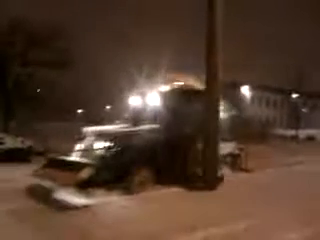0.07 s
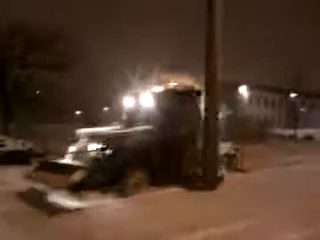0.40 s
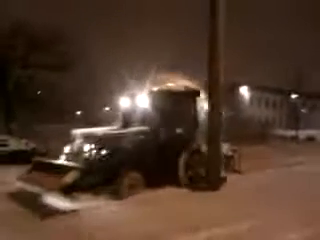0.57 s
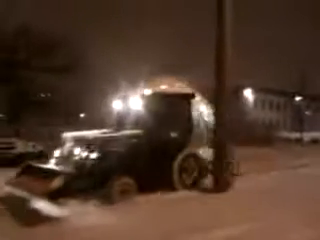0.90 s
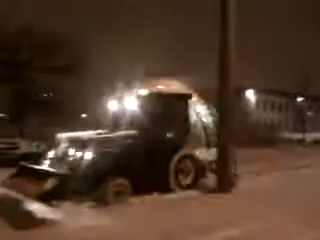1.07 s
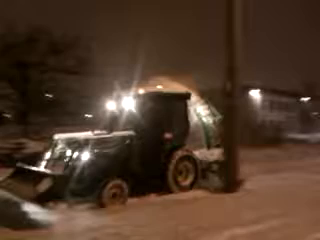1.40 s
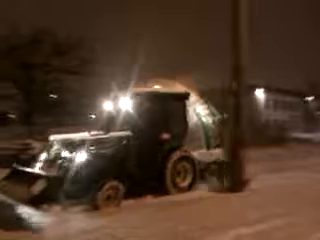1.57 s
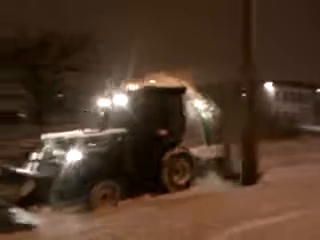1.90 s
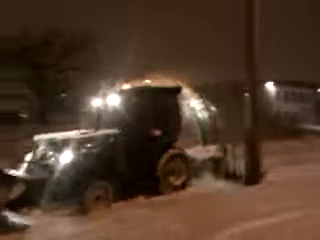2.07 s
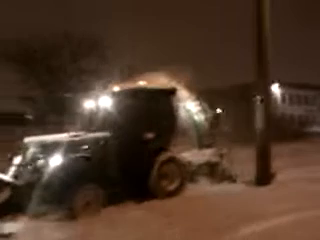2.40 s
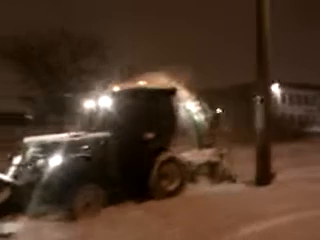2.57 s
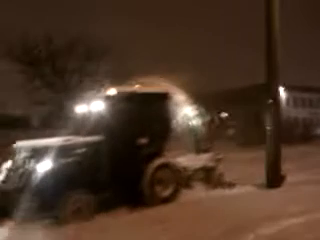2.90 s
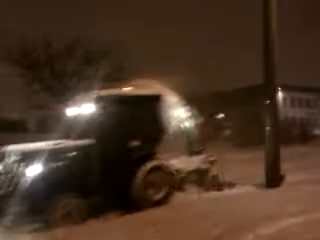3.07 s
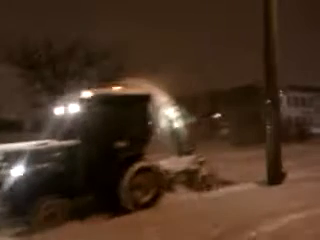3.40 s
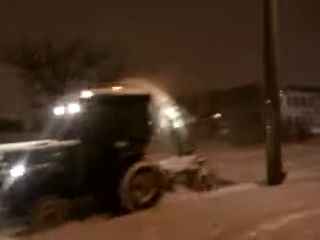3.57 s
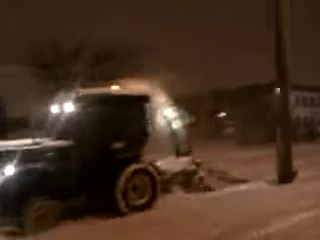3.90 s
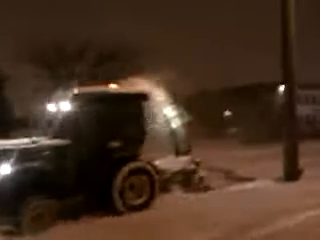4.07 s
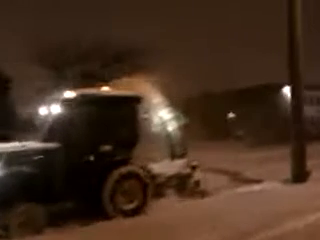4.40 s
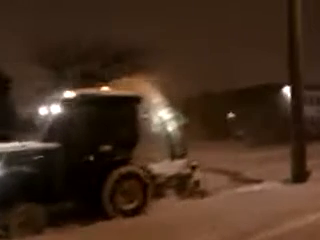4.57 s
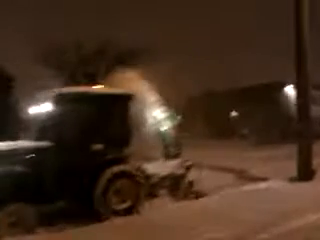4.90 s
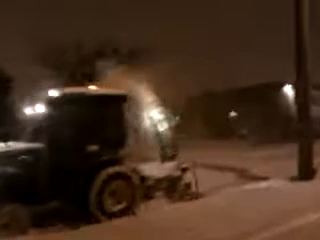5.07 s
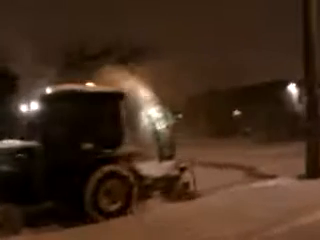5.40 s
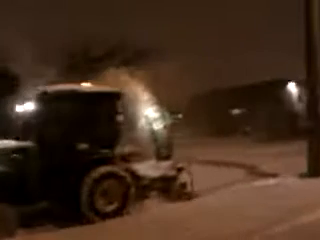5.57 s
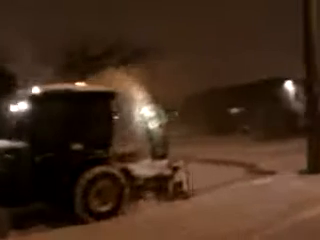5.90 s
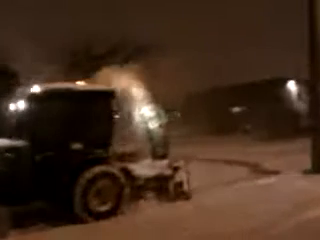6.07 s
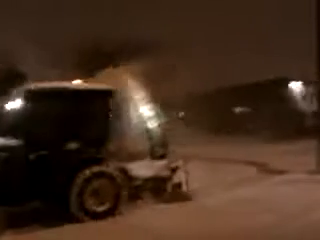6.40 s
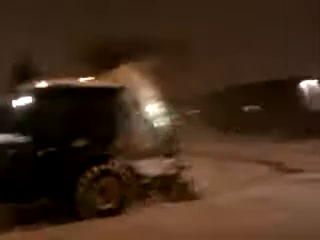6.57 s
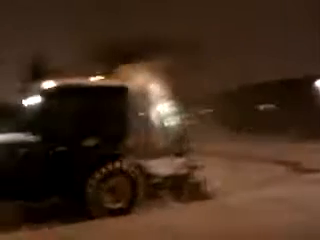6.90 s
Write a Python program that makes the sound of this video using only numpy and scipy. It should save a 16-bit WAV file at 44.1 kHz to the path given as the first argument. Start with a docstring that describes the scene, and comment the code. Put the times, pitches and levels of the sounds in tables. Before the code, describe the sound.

Steady, gritty roar of a slowly passing tractor and snowblower, with faint wavering gear whines and occasional icy ticks, heard through a narrow, boxy microphone.

```python
"""Tractor with a snowblower passing

By a straight track, a small microphone 5.5 m off its line hears a three-cylinder diesel tractor creep by.
Combustion knock and injector clatter are noise patterns that partly repeat with every engine cycle.
Gears whine as sines on multiples of the firing rate; the exhaust adds a faint hum and a fluttering rumble.
Snow hisses through the steel chute as gritty, ringing noise, and lumps of ice strike it in short bursts.
The blower's level follows its distance; the microphone passes little above 4 kHz."""
import sys
import numpy as np
from scipy import signal
from scipy.fft import rfft, irfft, next_fast_len
from scipy.io import wavfile
from scipy.ndimage import map_coordinates

SR = 44100
rng = np.random.default_rng(int(sys.argv[2]) if len(sys.argv) > 2 else 0)


def wrap_up_sound(samples):
    """Save the sound to the file named by the first command line argument, as 16-bit audio."""
    columns = np.atleast_2d(samples).T
    # keep every value between -1 and 1, then stretch to whole-number steps
    tamed = np.clip(columns, -1, 1)
    steps = np.round(tamed * 32767).astype(np.int16)
    wavfile.write(sys.argv[1], SR, steps)


N = 306936
TIME = np.arange(N) / SR  # s


def gain_of(db):
    """Decibels to amplitude."""
    return 10 ** (np.asarray(db) / 20)


def evened(x):
    """Scales to rms 1."""
    return x / np.sqrt(np.mean(x ** 2) + 1e-20)


def curves(rows):
    """Each column of a time table, interpolated sample by sample."""
    s, *columns = np.transpose(rows)
    return [np.interp(TIME, s, column) for column in columns]


def add(mix, s, sound):
    """Mixes a sound in at time s, cut off at the end of the mix."""
    part = mix[round(s * SR):][:len(sound)]
    part += sound[:len(part)]


def coloured(x, points):
    """Filters by a spectrum drawn on a log-frequency axis."""
    size = next_fast_len(N + 4096)
    hz, db = np.transpose(points)
    log_hz = np.log(np.fft.rfftfreq(size, 1 / SR) + 1)  # the 1 avoids log(0)
    shape_db = np.interp(log_hz, np.log(hz), db)
    return irfft(rfft(x, size) * gain_of(shape_db), size)[:N]


def resonate(x, hz, width_hz):
    """A double-pole resonance, evened to rms 1, whose pitch may follow a curve."""
    turn = np.exp(2j * np.pi * np.cumsum(hz * np.ones(len(x))) / SR)
    r = np.exp(-np.pi * width_hz / SR)
    # shift the ring to 0 Hz, filter there, shift back
    centred = signal.lfilter([1], [1, -2 * r, r * r], x / turn)
    return evened((turn * centred).real)


def low_pass(x, hz):
    """A steep band limit."""
    taps = signal.firwin(511, hz, window=("kaiser", 9), fs=SR)
    return signal.oaconvolve(x, taps, "same")


def wander(per_s):
    """A random curve of rms 1 through per_s new values a second, joined by straight lines."""
    knots = rng.standard_normal(4096)
    return evened(np.interp(TIME * per_s, np.arange(len(knots)), knots))


def grit(per_s, strength, decay_s):
    """Envelope of many tiny impacts, each with a sharp start, over a steady bed."""
    hits = (rng.random(N) < per_s / SR) * np.minimum(rng.exponential(1, N), 2)
    return 1 + strength * signal.lfilter([1], [1, -np.exp(-1 / (decay_s * SR))], hits)


def vibration(firings, repeat, renew_s):
    """Noise whose power share `repeat` recurs every three firings; the pattern drifts as the tractor moves."""
    size = 2240  # points in one engine cycle
    patterns = rng.standard_normal((64, size))
    place = [TIME / renew_s, firings / 3 % 1 * size]
    cyclic = evened(map_coordinates(patterns, place, order=1, mode="grid-wrap"))
    return np.sqrt(repeat) * cyclic + np.sqrt(1 - repeat) * rng.standard_normal(N)


def blows(firings, lag, cylinder_db, rise, decay, between, uneven_db):
    """Envelope of one blow a firing over a floor `between`; lag, rise and decay are in firing periods."""
    turns = firings - lag + 3  # the 3 keeps the count positive and the cylinders in order
    count, age = np.floor(turns).astype(int), turns % 1
    strength_db = np.choose(count % 3, cylinder_db) + uneven_db * rng.standard_normal(512)[count]
    pulse = (1 - np.exp(-age / rise)) * np.exp(-(age / decay) ** 2)
    return between + gain_of(strength_db) * pulse


# the blower at the rear passes closest at CLOSEST_S
CLOSEST_S, DISTANCE_M, DRIVE_M_PER_S = 6.56, 5.5, 1.59


def approach_db():
    """Level of the passing blower against its closest point: amplitude falls as 1 / distance."""
    along_m = DRIVE_M_PER_S * (TIME - CLOSEST_S)
    return 20 * np.log10(DISTANCE_M / np.hypot(DISTANCE_M, along_m))


# low hum at the exhaust: (multiple of the firing rate [-], level [dB])
EXHAUST_HUM = [(4, -58), (8, -67), (10, -51.5), (13, -53)]
# tone colour of the exhaust rumble: (frequency [Hz], relative level [dB])
RUMBLE_SPECTRUM = [(20, -22.5), (40, -28), (65, -4.5), (150, -3), (260, -1), (480, 5), (700, 4.5),
                   (1100, -18.5)]
# level at the closest point [dB]; the rumble grows by only a share of the approach
RUMBLE_DB, RUMBLE_SHARE = -35.5, 0.25


def exhaust(firings):
    """A faint hum of firing-rate multiples in a low, fluttering rumble that grows as the tractor nears."""
    hum = np.zeros(N)
    for multiple, db in EXHAUST_HUM:
        tone = np.sin(2 * np.pi * (round(multiple) * firings + rng.random()))
        hum += gain_of(db + wander(1.8)) * tone
    flutter = gain_of(1.8 * wander(70))
    rumble = evened(coloured(flutter * vibration(firings, repeat=.089, renew_s=.9), RUMBLE_SPECTRUM))
    return np.sqrt(2) * hum + gain_of(RUMBLE_DB + RUMBLE_SHARE * approach_db()) * rumble


# engine speed, rising as the load eases; also turns the whole scene: (time [s], firing rate [1/s])
FIRING_RATE = [(0.0, 59.55), (1.6, 58.91), (2.0, 59.16), (3.2, 58.75), (3.8, 58.88), (4.4, 58.45),
               (4.62, 60.35), (5.0, 61.42), (5.6, 61.36), (5.9, 60.77), (6.5, 60.99), (6.96, 60.65)]
# strength of each cylinder's knock through the block, also for the engine: (relative level [dB]) x 3
KNOCK_BY_CYLINDER = [-4, 3, -8]
# the block, heard more and less as its angle changes, also for the engine:
# (time [s], knock level [dB], whine level [dB])
BLOCK_LEVELS = [(0, -29, -36), (.85, -27, -37.5), (1.7, -35, -51), (2.45, -31.5, -31), (2.95, -30, -27),
                (3.55, -34.5, -39), (4.25, -32.5, -39.5), (4.8, -39, -51.5), (5.5, -31, -46.5),
                (6.25, -29.5, -25), (6.96, -30.5, -29.5)]
# gear tones that the block radiates: (multiple of the firing rate [-])
BLOCK_TONES = [30, 31]
# whine of the blower's gearbox: (time [s], level [dB])
GEARBOX_LEVEL = [(0, -51), (1.65, -35), (2.85, -60), (4.05, -35), (4.6, -49.5), (5.1, -30.5), (5.7, -34.5),
                 (6.5, -31.5), (6.96, -33)]
# narrow ring of the engine hood, also for the engine: (time [s], level [dB])
HOOD_LEVEL = [(0, -30), (1.2, -39), (2, -43.5), (4.7, -43.5), (5.45, -28), (5.95, -36), (6.96, -35)]
BLOCK_MODE_HZ, BLOCK_MODE_WIDTH_HZ = 1802, 64
# gear tones of the blower drive and of the hood (multiples of the firing rate)
SHAFT_ORDER, GEARBOX_ORDER, HOOD_ORDER = 12, 18, 36
# shaft tone [dB] at working speed [firings per s], and its rise with speed
SHAFT_DB, WORKING_HZ, SHAFT_DB_PER_HZ = -44, 59.43, 2


def gears(firings):
    """Meshing teeth sing on multiples of the firing rate; power strokes shake their level."""
    speed = curves(FIRING_RATE)[0]
    gearbox_db, hood_db = curves(GEARBOX_LEVEL)[0], curves(HOOD_LEVEL)[0]
    block_db = curves(BLOCK_LEVELS)[1]
    turns = firings + .003 * wander(14)  # slight unsteadiness of pitch
    shake = evened(blows(firings, lag=.62, cylinder_db=KNOCK_BY_CYLINDER, rise=.1, decay=.5,
                         between=.5, uneven_db=1.2))
    levels = [(SHAFT_ORDER, SHAFT_DB + SHAFT_DB_PER_HZ * (speed - WORKING_HZ)),
              (GEARBOX_ORDER, gearbox_db),
              (HOOD_ORDER, hood_db + .5 * approach_db())]
    for order in BLOCK_TONES:
        # loudest when the tone meets the block's mode
        off_mode = 2 * (order * speed - BLOCK_MODE_HZ) / BLOCK_MODE_WIDTH_HZ
        levels.append((order, block_db - 10 * np.log10(1 + off_mode ** 2)))
    whine = np.zeros(N)
    for order, db in levels:
        tone = np.sin(2 * np.pi * (order * turns + rng.random()))
        whine += gain_of(db + 2 * wander(18)) * tone
    return np.sqrt(2) * shake * whine


# lumps of ice strike the chute: (time [s], level before the fade [dB], ring [Hz], length [s])
ICE_LUMPS = [(1.94, -17, 3450, .007), (3.11, -14.5, 2800, .004), (3.516, -14, 3400, .007),
             (3.585, -18, 3450, .02), (3.618, -16, 3200, .006), (4.864, -10.5, 3300, .005),
             (5.112, -13.5, 3350, .008), (5.366, -15, 2400, .015), (5.369, -12.5, 3150, .015),
             (5.503, -10.5, 3250, .006)]


def lumps():
    """Each lump crumbles against the steel in a short ringing burst of noise."""
    out, t = np.zeros(N), TIME[:4096]
    for s, db, hz, length_s in ICE_LUMPS:
        ring = resonate(rng.standard_normal(len(t)), hz, width_hz=900)
        onset = np.minimum(t * 2000, 1)  # half a millisecond
        add(out, s, gain_of(db) * ring * np.exp(-(t / length_s) ** 4) * onset)
    return out


# clatter of each cylinder, heard from ahead and then from the side, also for the engine:
# (time [s], first level [dB], second level [dB], third level [dB]), all relative
CLATTER_BY_CYLINDER = [(3.2, 3, -3.5, -1.5), (5.6, -1, -0.5, 3.5)]
# tone colour of the impeller: (frequency [Hz], relative level [dB])
ROAR_SPECTRUM = [(150, -25), (400, -16), (600, -4), (760, 7), (950, 5), (1250, 7.5), (1600, 8),
                 (2000, -3.5), (3000, -7.5), (4500, -16.5)]
# tone colour of the flying snow: (frequency [Hz], relative level [dB])
SPRAY_SPECTRUM = [(500, -25.5), (2000, -9), (3000, 8.5), (3600, -9.5), (4500, -5.5)]
# ring of the chute: (time [s], frequency [Hz])
CHUTE_RING = [(1.2, 3562), (2.75, 3336), (4.4, 3557), (5.4, 3340)]
# the auger bites into deeper snow and the hiss surges: (time [s], rise [dB], half length [s])
SNOW_SURGES = [(2.25, 3.8, 0.41), (3.562, 3.5, 0.15), (4.258, 2, 0.21), (4.846, 3, 0.26),
               (5.298, 1.5, 0.42)]
# levels at the closest point [dB]
ROAR_DB, HISS_DB = -26.5, -25
# the hiss swells while the mouth of the chute faces the microphone
FACING_S, FACING_WIDTH_S, FACING_DB = 4.4, 1.6, 4.5


def blower(firings):
    """The impeller roars; snow scours the chute in gritty clumps, shaken in time with the engine."""
    churn = grit(per_s=200, strength=.55, decay_s=.002)
    roar = evened(coloured(churn * vibration(firings, repeat=.14, renew_s=.892), ROAR_SPECTRUM))
    shake = blows(firings, lag=.78, cylinder_db=curves(CLATTER_BY_CYLINDER), rise=.06, decay=.3,
                  between=.85, uneven_db=2.4)
    feed = gain_of(wander(15))  # the auger delivers snow unevenly
    clumps = grit(per_s=170, strength=1.1, decay_s=.0017)
    chute_hz = curves(CHUTE_RING)[0]
    ring = resonate(shake * vibration(firings, repeat=.35, renew_s=.8), chute_hz, width_hz=494)
    snow = shake * clumps * vibration(firings, repeat=.27, renew_s=.8)
    spray = evened(coloured(snow, SPRAY_SPECTRUM))
    hiss_db = HISS_DB + FACING_DB * np.exp(-((TIME - FACING_S) / FACING_WIDTH_S) ** 2)
    for s, rise_db, length_s in SNOW_SURGES:
        hiss_db += rise_db * np.exp(-((TIME - s) / length_s) ** 2)
    hiss = gain_of(hiss_db) * feed * (ring + gain_of(-2.5) * spray)
    return gain_of(approach_db()) * (gain_of(ROAR_DB) * roar + hiss)


# a rattling side panel: (time [s], level [dB], ring [Hz])
SIDE_PANEL = [(0, -27, 2556), (1.8, -27.5, 2650), (2.7, -24, 2740), (3.3, -22.5, 2680), (4.3, -27, 2750),
              (5.1, -30.5, 2750), (5.6, -29, 2960), (6.25, -25.5, 2875)]
# valve clatter: (time [s], level [dB])
VALVE_LEVEL = [(.6, -20.5), (2.2, -19.5), (2.9, -24), (4.9, -18.5), (6.96, -20.5)]
# tone colour of the valve clatter: (frequency [Hz], relative level [dB])
VALVE_SPECTRUM = [(300, -29), (900, -18), (1500, -9), (2000, -2), (2250, 2), (2500, -1), (2900, 0),
                  (3500, -5), (4500, -7)]


def engine(firings):
    """Combustion knocks ring the block; injectors and valves clatter and ring a panel and the hood."""
    knock_db, (panel_db, panel_hz) = curves(BLOCK_LEVELS)[0], curves(SIDE_PANEL)
    valve_db, hood_db = curves(VALVE_LEVEL)[0], curves(HOOD_LEVEL)[0]
    clatter_db = curves(CLATTER_BY_CYLINDER)
    knock = blows(firings, lag=.6, cylinder_db=KNOCK_BY_CYLINDER, rise=.16, decay=.6,
                  between=.08, uneven_db=.8)
    taps = blows(firings, lag=.71, cylinder_db=clatter_db, rise=.06, decay=.42,
                 between=.55, uneven_db=1.2)
    valve_taps = blows(firings, lag=.88, cylinder_db=clatter_db, rise=.06, decay=.3,
                       between=1.6, uneven_db=1.4)
    impacts = grit(per_s=420, strength=.6, decay_s=.0007)
    block = resonate(knock * vibration(firings, repeat=.4, renew_s=1.2), 1886, width_hz=330)
    panel = resonate(taps * vibration(firings, repeat=.45, renew_s=1.1), panel_hz, width_hz=370)
    valve_noise = valve_taps * impacts * vibration(firings, repeat=.5, renew_s=1.1)
    valves = evened(coloured(valve_noise, VALVE_SPECTRUM))
    hood = resonate(taps * vibration(firings, repeat=.34, renew_s=1.1), 2230, width_hz=220)
    return (gain_of(knock_db) * block + gain_of(panel_db) * panel
            + gain_of(valve_db) * valves + gain_of(hood_db) * hood)


def scene():
    """Everything but the ice lumps turns with the one crankshaft, counted in firings."""
    firings = np.cumsum(curves(FIRING_RATE)[0]) / SR
    return (exhaust(firings) + gears(firings) + lumps() + blower(firings) + engine(firings))[None]


# response of the small microphone: (frequency [Hz], gain [dB])
MICROPHONE_RESPONSE = [(20, 0), (3550, 0), (3750, -5.5), (3900, -11), (4100, -14.5), (4400, -19),
                       (4700, -33)]
# thin sharp ticks that bypass the microphone's response: (time [s], peak before the band limit [dB])
THIN_TICKS = [(3.402, -42), (4.5897, -14), (5.378, -14)]
MIC_EDGE_HZ, EDGE_HZ = 4620, 16000


def record(dry):
    """A narrow-band microphone, a few thin ticks that reach above its range, then the band limit."""
    heard = low_pass(coloured(dry[0], MICROPHONE_RESPONSE), MIC_EDGE_HZ)
    for s, db in THIN_TICKS:
        add(heard, s, gain_of(db) * np.exp(-TIME[:64] / .00007))
    return low_pass(heard, EDGE_HZ)[None]


dry = scene()
out = record(dry)
wrap_up_sound(out)
```